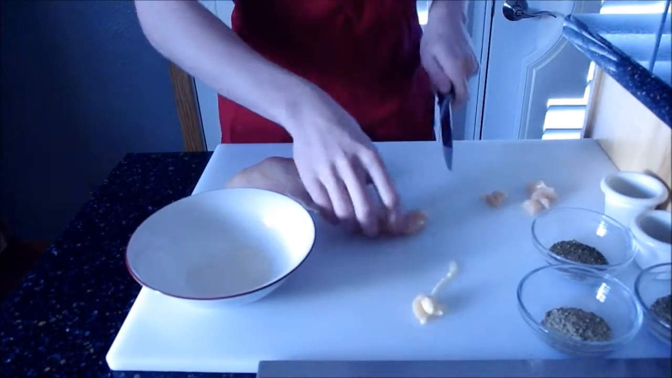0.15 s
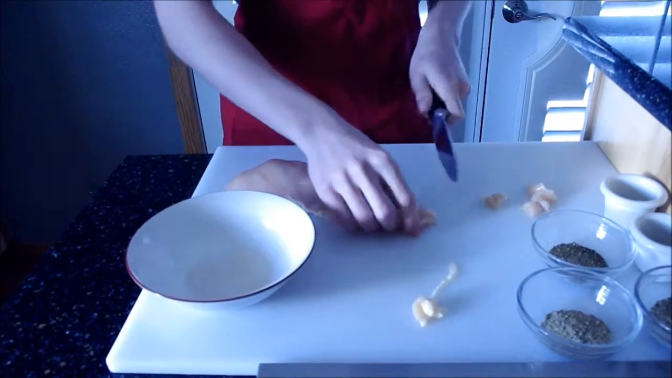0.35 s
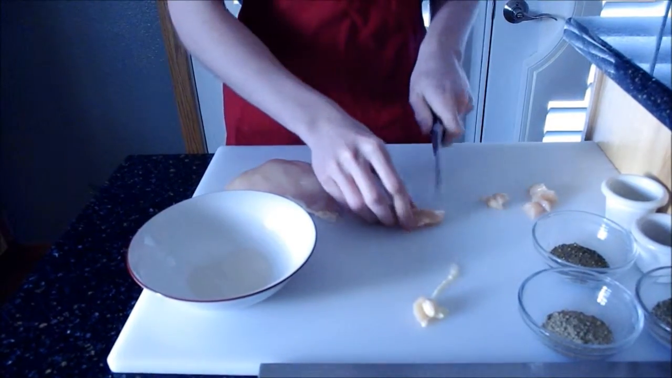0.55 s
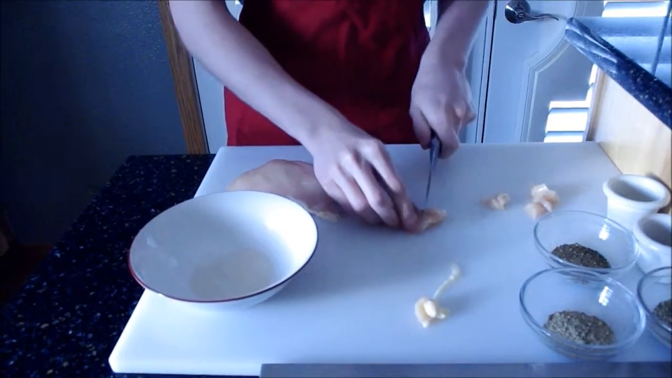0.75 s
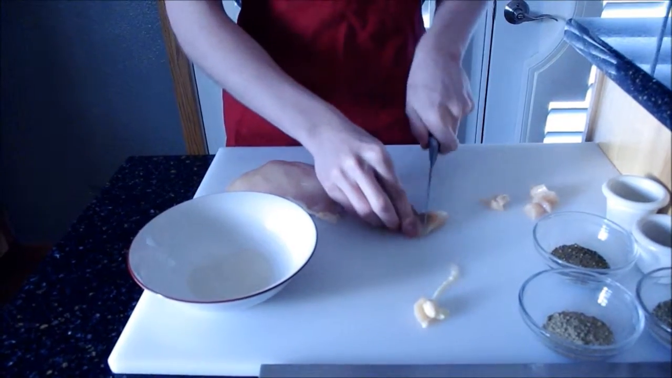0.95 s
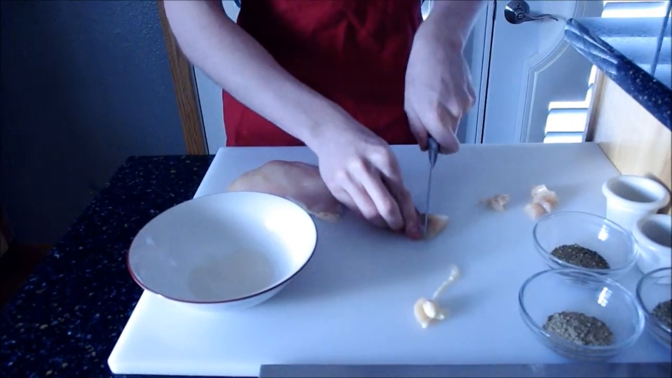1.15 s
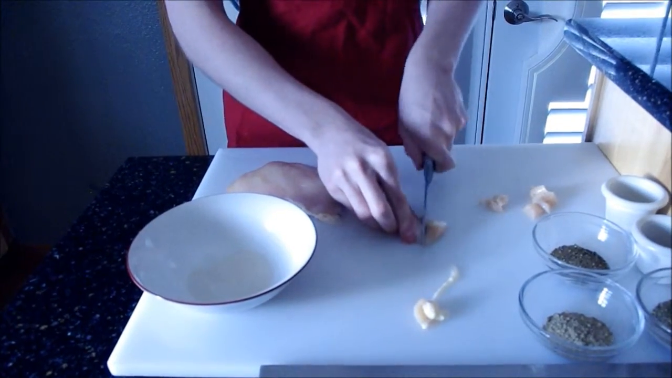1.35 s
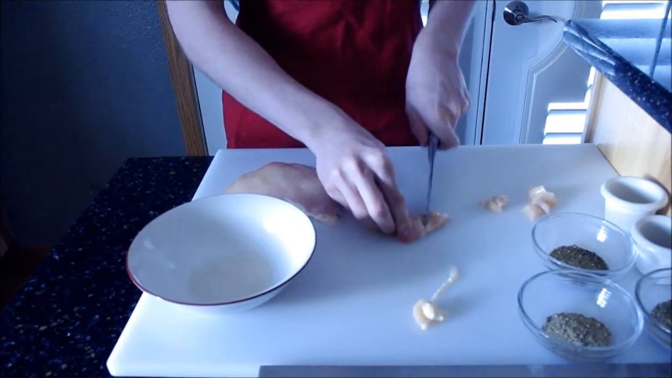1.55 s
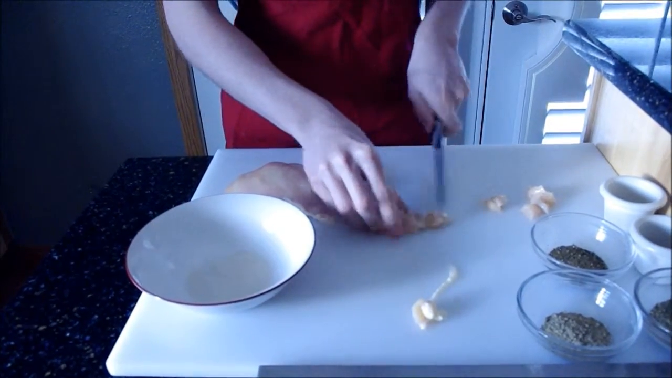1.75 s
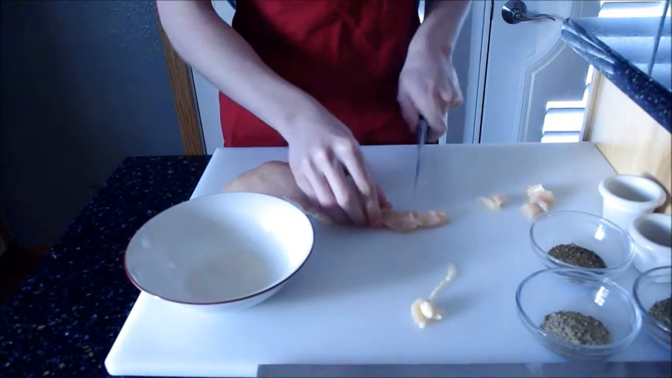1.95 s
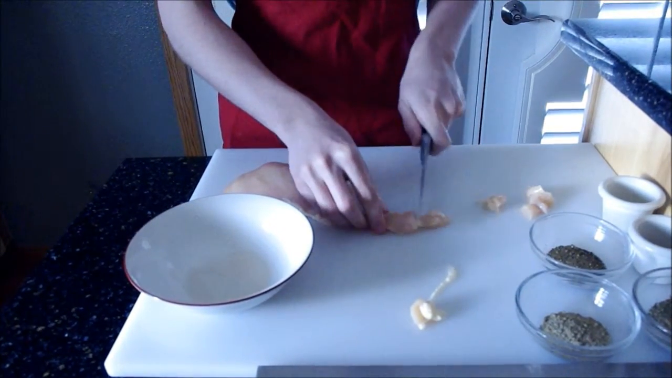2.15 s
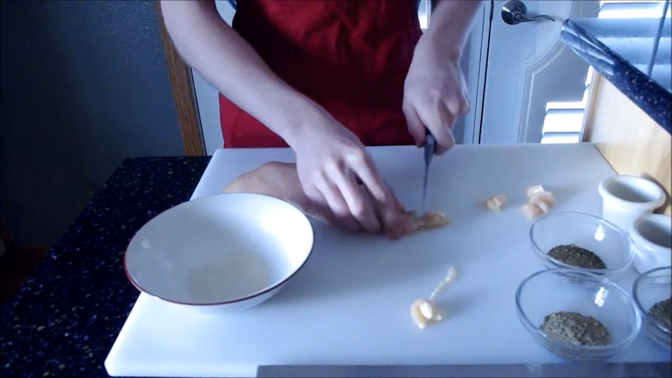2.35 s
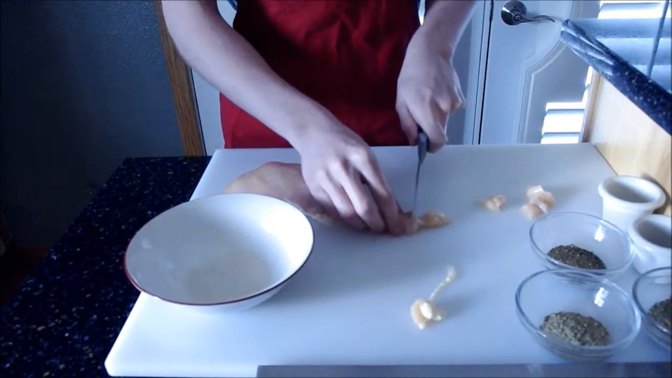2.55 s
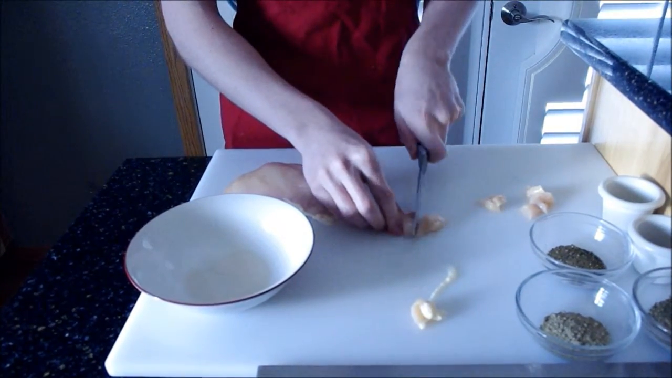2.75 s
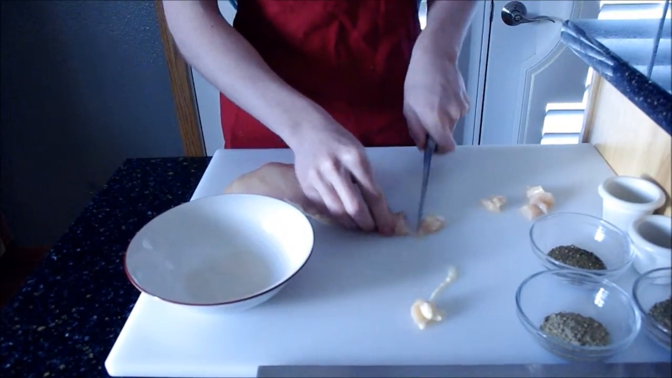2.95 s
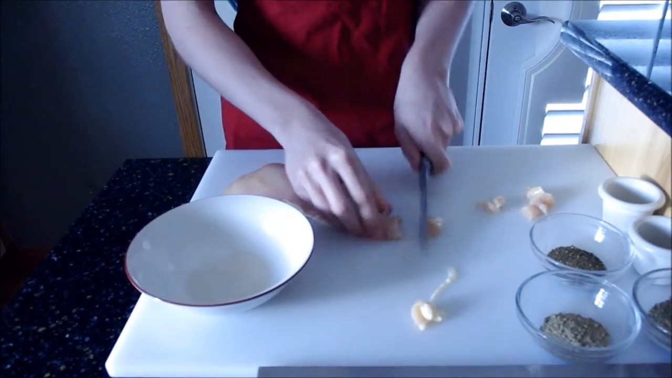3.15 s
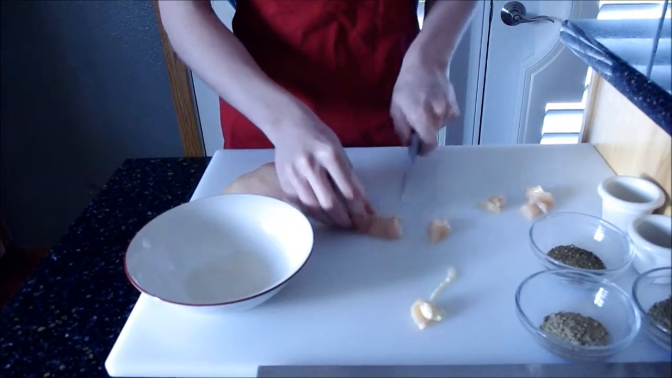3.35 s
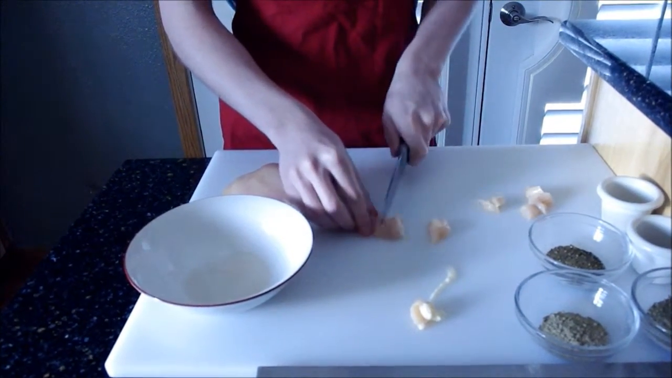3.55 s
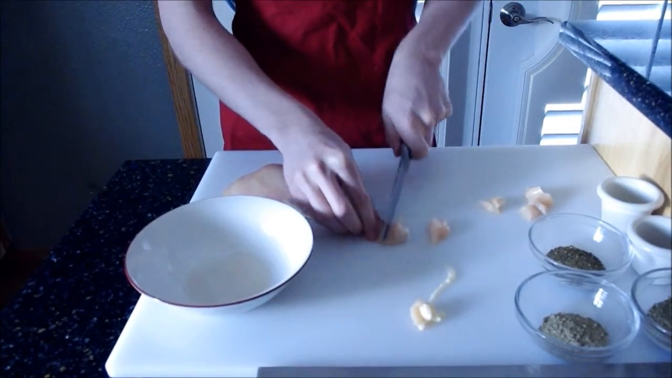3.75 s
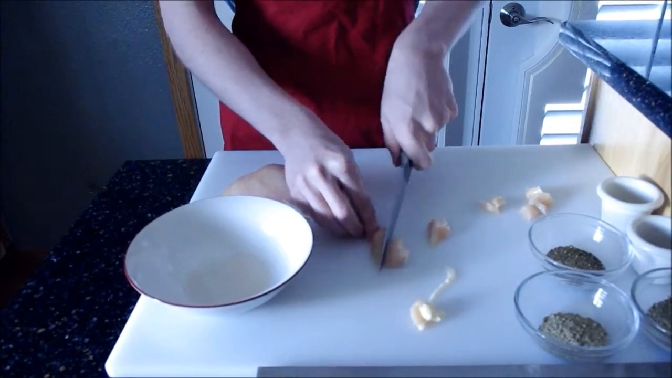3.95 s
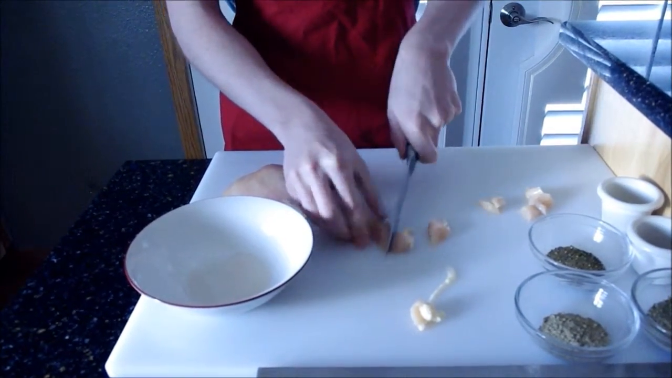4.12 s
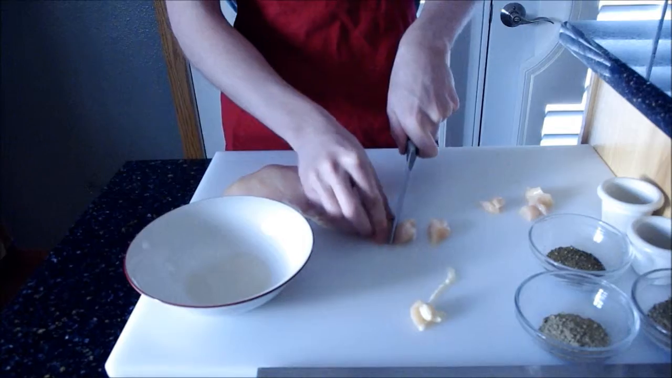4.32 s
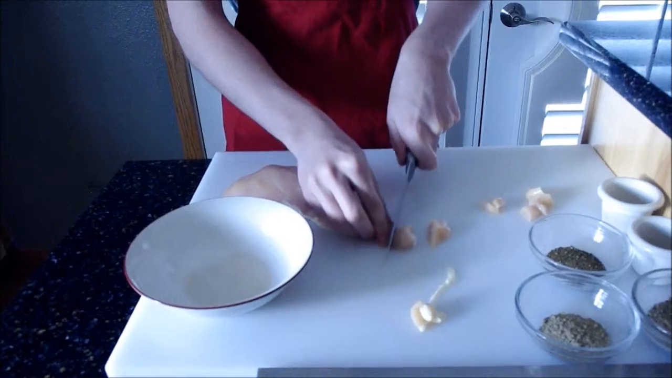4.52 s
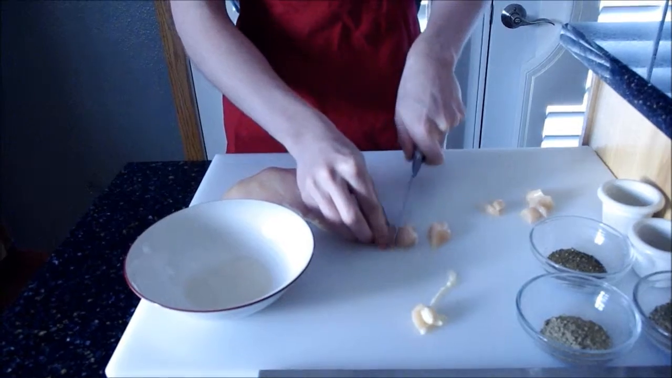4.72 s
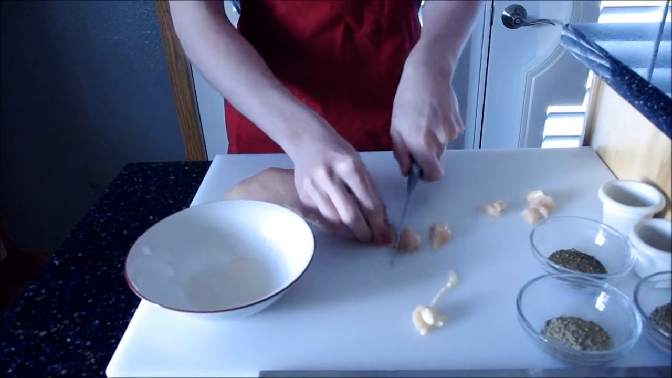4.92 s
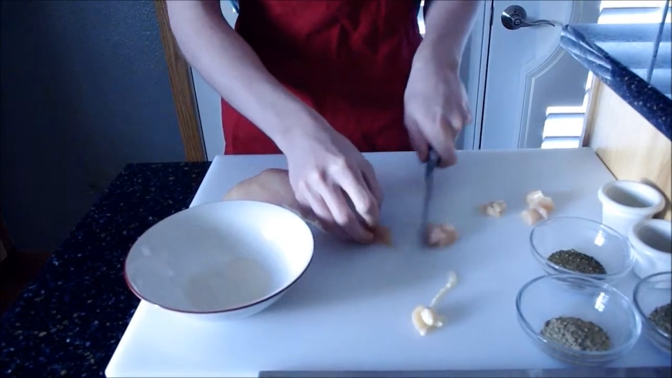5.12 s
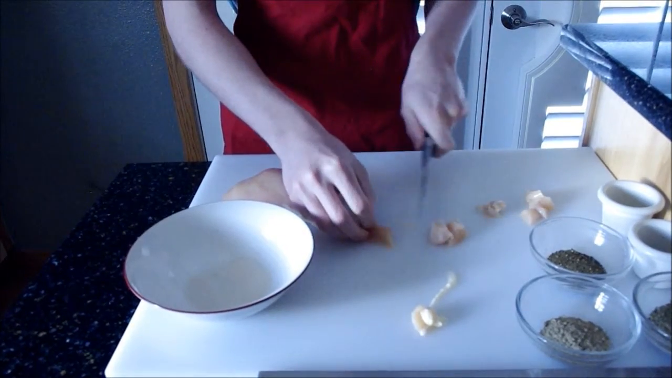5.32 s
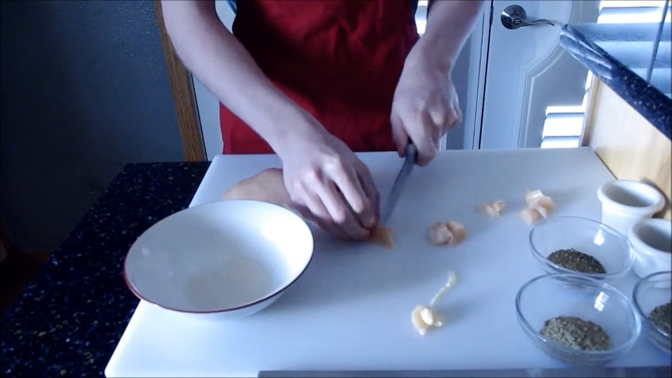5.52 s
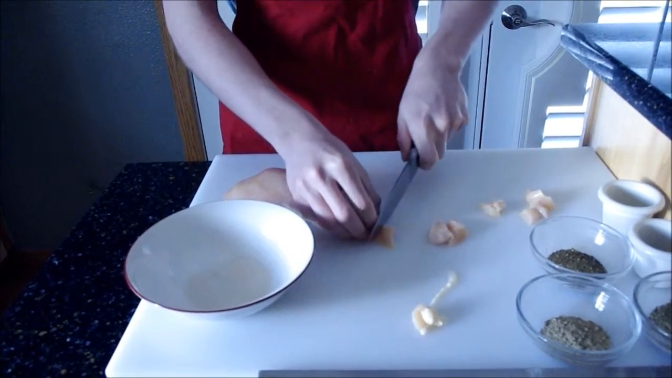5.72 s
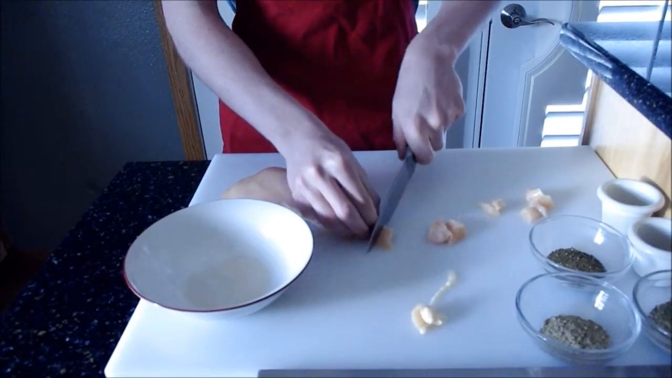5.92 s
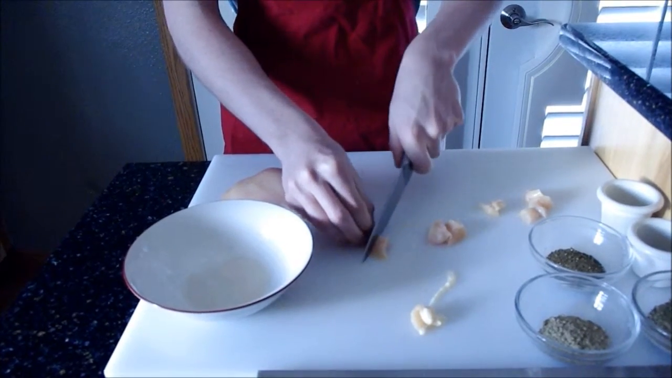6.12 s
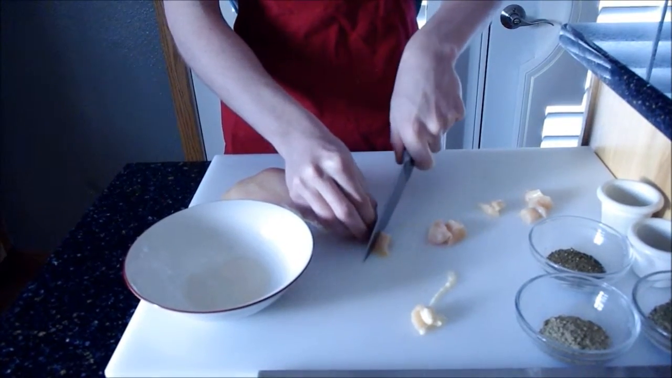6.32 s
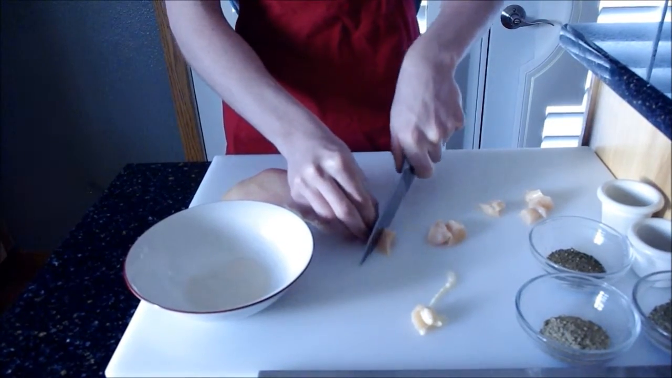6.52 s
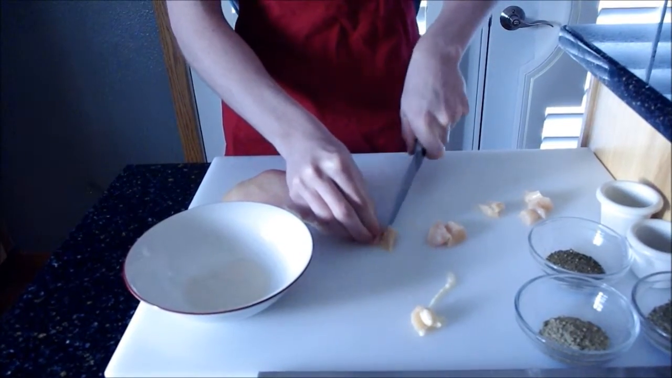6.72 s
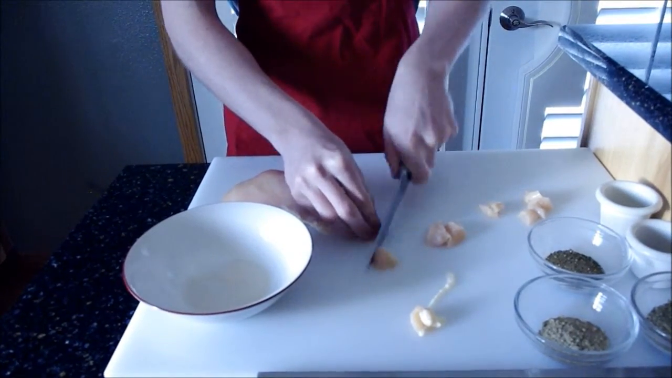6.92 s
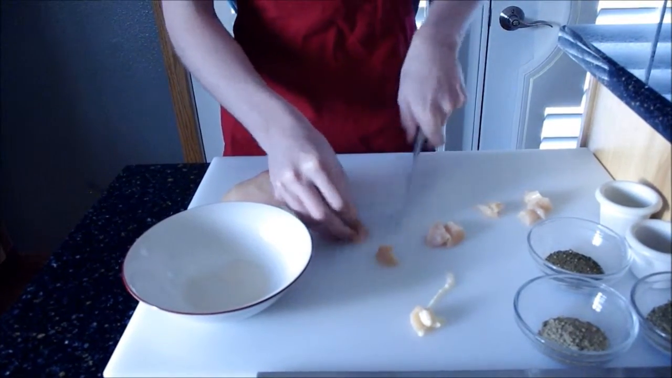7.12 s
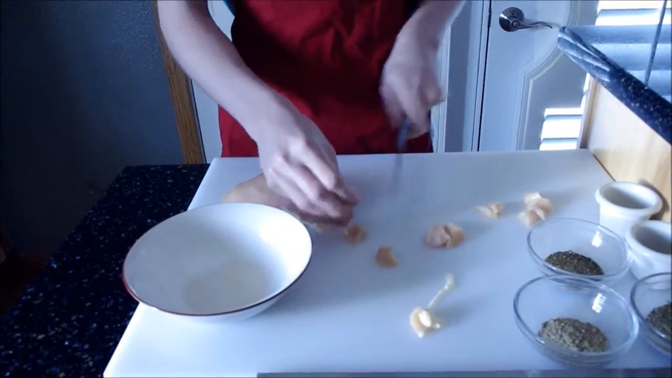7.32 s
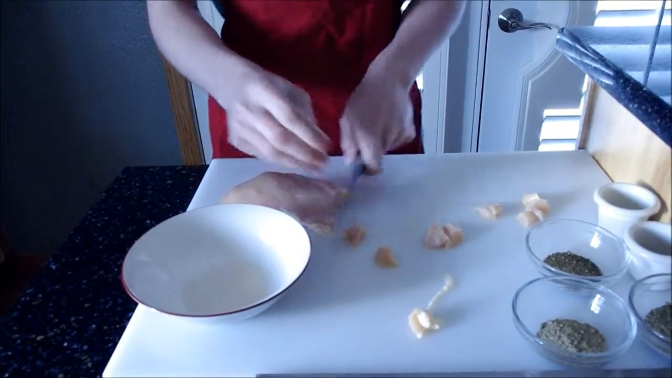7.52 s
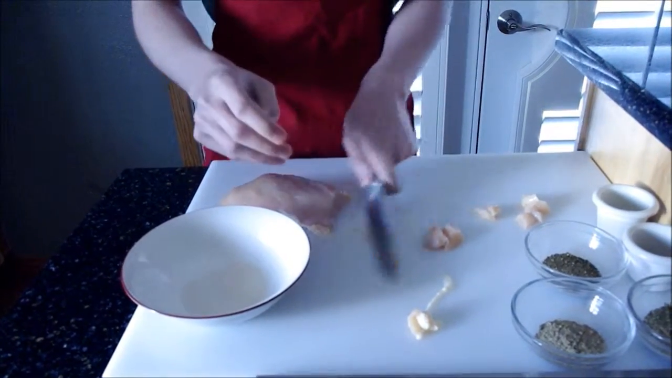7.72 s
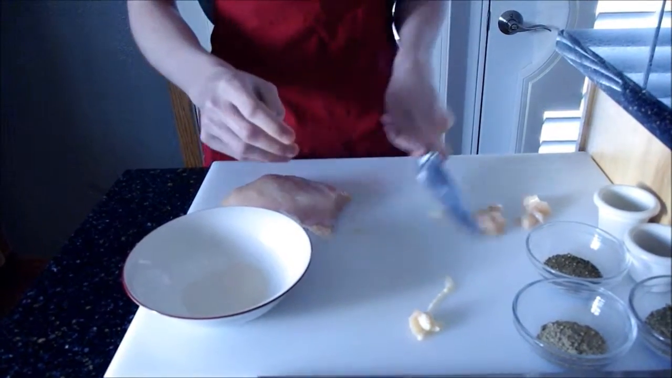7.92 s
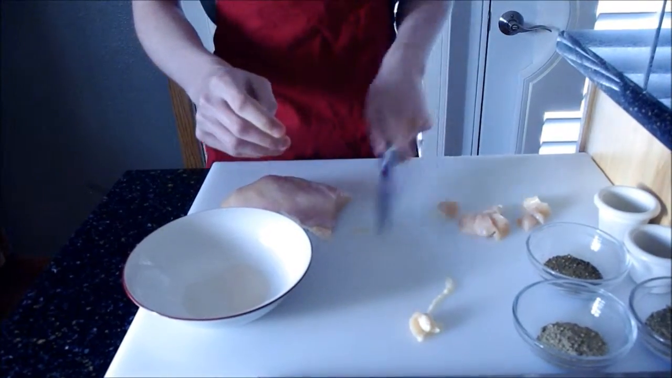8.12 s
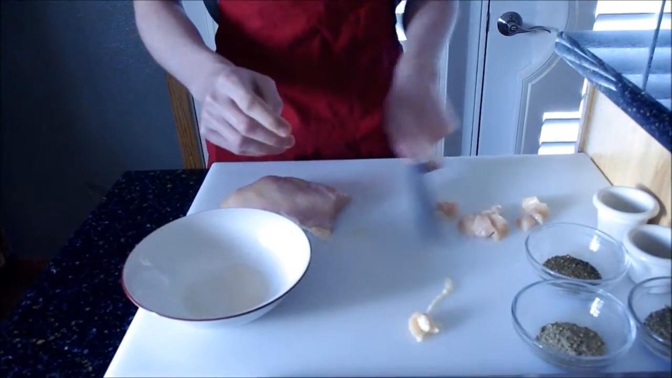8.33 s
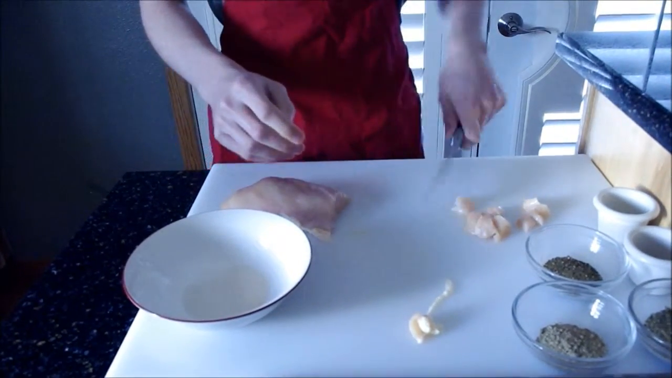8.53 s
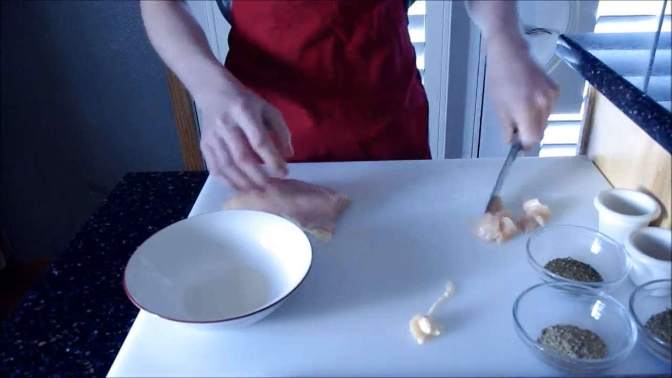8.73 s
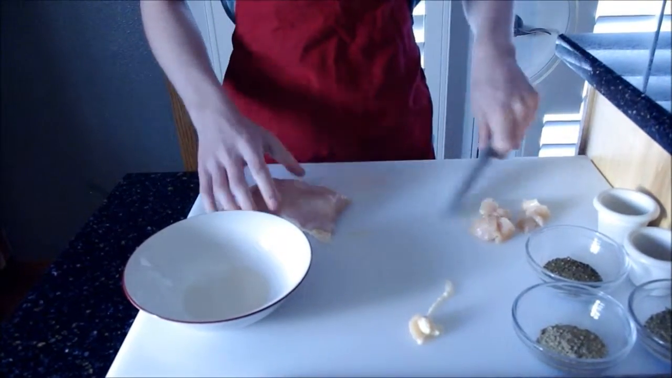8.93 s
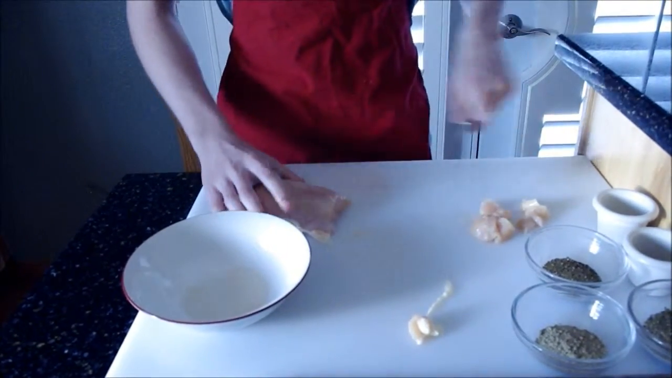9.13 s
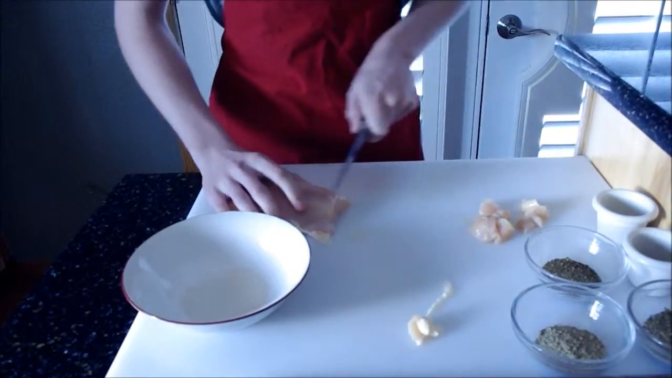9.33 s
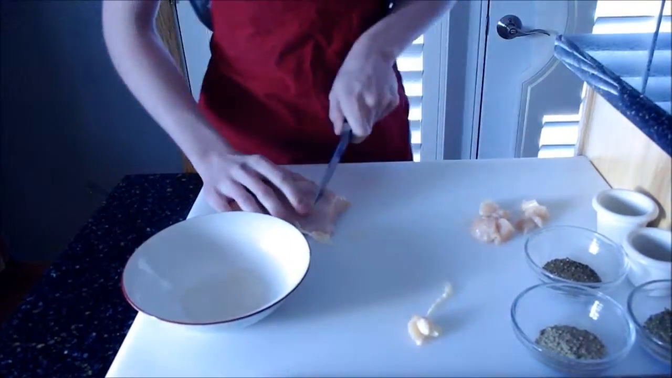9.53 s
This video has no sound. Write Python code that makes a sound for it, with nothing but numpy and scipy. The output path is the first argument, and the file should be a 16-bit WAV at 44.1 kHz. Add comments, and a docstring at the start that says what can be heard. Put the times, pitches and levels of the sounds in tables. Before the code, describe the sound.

A small, hard kitchen heard close up, with steady soft noise, faint mains hum and a thin high whine. A brief knife scrape opens, then quiet wet sawing with tiny ticks at 0.5-1.7 s and a soft tap at 1.24. A short drag at 1.9 precedes a firm knock on the plastic board at 2.8, with a scrape at 3.3. Crackly slicing and fibre snaps run from 3.8 to 5, with a faint hollow bump at 4.6 and a scrape and bright snap near 5.2. After light strokes around 6, a stronger hollow bump clinks at 6.5. Gentle sawing, with a faint narrow hiss, leads to a sharp tick and drag at 7.25. A hard tap at 7.7 starts a rasping sweep; a softer, steelier sweep follows at 8.35. Strong taps with scrapes hit at 8.73 and 9.06, then meat slides very faintly, with another slight hiss.

```python
"""A kitchen knife slices raw meat on a plastic board: taps, wet sawing, ticks, and scrapes that push pieces aside.
Near the end meat slides under the hand. Mains hum, a thin whine and soft noise lie under it; a small hard kitchen answers.
Impacts and random slips drive the modes of blade and board; meat strokes are crackle, fibre snaps short noise bursts.
Hollow bumps, one clink and a faint narrow hiss that swells and fades are added."""
import sys
import numpy as np
from scipy import signal
from scipy.fft import rfft, irfft
from scipy.io import wavfile
from scipy.ndimage import uniform_filter1d

SR = 44100
rng = np.random.default_rng(int(sys.argv[2]) if len(sys.argv) > 2 else 0)


def wav_out(sig):
    """Save sig, one row per channel (or a flat mono array), as 16-bit PCM at SR to the path in sys.argv[1]."""
    wavfile.write(sys.argv[1], SR, np.round(np.clip(np.atleast_2d(sig).T, -1, 1) * 32767).astype(np.int16))


N = 426447

# Steady noise spectrum. Each row: frequency in Hz, relative density in dB.
AIR_SPECTRUM = [(35, -55), (60, -22.5), (80, -33), (110, -20), (250, -12), (500, -14), (800, -15),
                (1440, -22), (3000, -26), (6500, -31.5), (8000, -31), (10000, -34.5), (15000, -55.5)]
AIR_DB = -54
# Mains harmonics. Each row: frequency in Hz, mean rms level in dB.
HUM_TONES = [(177.6, -67.5), (360.7, -79), (538.3, -63), (721.4, -66.5), (780.6, -70), (899.0, -102),
             (1200, -69), (1260, -79)]
# Thin high tones. Each row: frequency in Hz, mean rms level in dB.
WHINE_TONES = [(7440, -82), (7838, -85), (7897, -69), (7957, -90)]
# Room decay. Each row: band centre in Hz, t60 in seconds, relative level in dB.
ROOM_BANDS = [(207, 0.38, 4), (526, 0.26, 10), (1103, 0.42, 7.5), (2820, 0.4, 6), (6000, 0.39, -2),
              (13000, 0.18, 5)]
SNAP_ROOM_DB = -4  # thin ticks feed the room less than the board does
BASS_CUT_HZ, TREBLE_DROOP_HZ, TOP_HZ = 200, 9860, 15100
# Faint narrow hiss. Each row: start in seconds, length in seconds, level in dB.
NARROW_HISSES = [(6.7, 0.82, -64.5), (9.12, 0.6, -63.5)]
NARROW_HISS_HZ = 3160
# Something hollow bumps the counter. Each row: start in seconds, level in dB.
BUMP_EVENTS = [(4.608, -29), (6.482, -21)]
# Modes of the hollow thing. Each row: frequency in Hz, width in Hz, level in dB.
HOLLOW_MODES = [(247, 42, -5), (468, 12.4, 2.5), (790, 120, -5), (1230, 53, -5), (1980, 34, -21),
                (2550, 64, 2), (3000, 99, -14)]
# Counter and steel shiver once. Each row: frequency in Hz, relative level in dB, t60 in seconds.
CLINK_MODES = [(113, 1, 0.17), (1985, -4.5, 0.16), (4720, -8, 0.065), (4830, -4, 0.045), (8100, -8, .05),
               (8000, -4, .06), (8480, 8, 0.047), (12600, -8, .04)]
CLINK_START_S, CLINK_DB = 6.487, -32.5
# Wet fibres let go of the steel. Each row: start in seconds, level in dB, pitch in Hz, width in octaves.
FIBRE_SNAPS = [(0.4933, -43, 4240, 1), (0.9287, -41, 8000, 0.63), (1.1336, -21.5, 5460, 1.66),
               (1.413, -34, 7080, 1.1), (1.5459, -34, 8500, .85), (1.5705, -27.5, 8900, 0.2),
               (2.8364, -39, 3770, 0.75), (2.8673, -28, 3920, 1.1), (2.884, -29, 7660, 0.26),
               (2.905, -35, 8300, 0.48), (2.928, -28.5, 7740, 0.38), (3.024, -34, 7200, 0.91),
               (3.055, -32.5, 5700, 1.7), (3.9314, -34, 6500, 1.7), (3.956, -34.5, 4630, 0.84),
               (4.031, -32, 7280, .9), (4.049, -33, 5700, 0.71), (4.208, -26, 4430, 1.8),
               (4.276, -32, 5170, 2.8), (4.777, -31, 8000, 0.74), (4.8097, -28.5, 8150, 0.47),
               (4.8336, -26.5, 8900, 0.64), (5.258, -18, 8400, 1.9), (5.289, -21.5, 8850, 0.19),
               (6.0048, -39, 5060, 0.61), (6.122, -45, 7940, 1), (6.1657, -34, 8350, 0.72),
               (6.401, -38, 7700, .9), (6.6757, -35, 10700, 0.26), (6.7131, -37, 8620, 0.74),
               (6.895, -40, 6000, 0.75), (7.1102, -40, 3850, 0.69), (7.2727, -15, 8400, .6),
               (7.81, -19, 3600, 1.5), (8.018, -23, 8830, 0.69), (8.095, -34, 8810, .8),
               (8.7594, -29, 7070, 0.82), (9.0952, -20, 6600, 0.45)]
# Board modes. Each row: frequency in Hz, width in Hz before broadening, relative level in dB.
BOARD_MODES = [(678, 45, -8), (1158, 38, 1), (1650, 50, -9), (2020, 32, -10), (2320, 60, 1), (2735, 22, -5),
               (2940, 30, -12), (3250, 120, -11), (3880, 70, -16), (4380, 150, -12)]
# Blade modes. Each row: frequency in Hz, width in Hz before broadening, relative level in dB.
BLADE_MODES = [(4840, 200, -15), (5390, 30, 0), (6830, 120, -2), (7080, 50, -5), (8460, 40, -9),
               (8950, 120, 3), (10200, 65, -3), (11230, 60, 3), (12100, 50, -5), (13700, 90, -8)]
# Sawing strokes, one short scrape (6.178 s), and meat sliding under the hand at the end (last two rows).
# Each row: full at in seconds, rise, hold and fall in seconds, hiss and body in dB.
MEAT_STROKES = [(0.49, .1, 0.0086, 0.087, -53.5, -53), (1.134, 0.12, 0.0026, 0.036, -54, -52),
                (1.18, .06, 0.055, 0.056, -58, -75), (1.448, 0.11, .005, 0.078, -46, -51),
                (1.572, .03, .005, 0.061, -52, -50.5), (1.64, 0.29, 0.022, 0.11, -53.5, -47.5),
                (2.884, 0.17, 0.025, 0.18, -47.5, -54), (3.03, 0.027, 0.078, 0.065, -50, -47),
                (3.22, 0.12, 0.042, .03, -52, -47.5), (3.842, 0.071, 0.0046, 0.088, -58, -66),
                (3.956, 0.1, .005, 0.085, -45, -51), (4.058, 0.032, .005, 0.063, -46.5, -40),
                (4.204, 0.031, 0.0073, 0.15, -52, -43.5), (4.56, 0.37, 0.027, 0.11, -57, -61),
                (4.81, 0.14, .03, 0.26, -52.5, -53), (4.984, .1, .005, 0.4, -55.5, -57.5),
                (6.002, 0.038, .005, .12, -55.5, -74), (6.126, 0.19, 0.0046, 0.036, -55, -58.5),
                (6.178, 0.032, 0.011, 0.049, -43.5, -42), (6.46, 0.13, 0.0069, .04, -53, -55),
                (6.676, 0.016, 0.17, 0.059, -55, -53), (6.93, 0.076, 0.16, 0.074, -55, -53),
                (7.14, 0.077, 0.18, .05, -50, -52), (7.56, 0.23, .02, 0.18, -48, -56),
                (9.21, .03, .005, 0.45, -83, -62), (9.42, 0.67, 0.039, 0.58, -72, -65)]
# Short drags over the board. Each row: full at in seconds, rise, hold and fall in seconds,
# then blade ring, scratch, board ring, shudder and rumble in dB.
SCRAPE_STROKES = [(0.018, 0.028, 0.0032, 0.033, -30, -29.5, -45, -42, -75),
                  (1.864, 0.047, 0.026, 0.025, -33, -32, -59, -35.5, -48),
                  (2.808, 0.0055, .01, .12, -54, -36, -57, -42, -56),
                  (3.276, 0.0056, 0.014, 0.022, -33.5, -34.5, -43, -39, -39),
                  (5.19, 0.054, 0.053, 0.063, -37, -33, -54, -35, -53),
                  (5.29, 0.031, .003, 0.016, -34, -45, -39.5, -54, -44),
                  (7.252, 0.062, 0.026, 0.045, -31, -30.5, -32.5, -37, -52),
                  (8.728, 0.0035, 0.072, 0.092, -45, -28.5, -43, -39, -46),
                  (9.069, 0.0039, 0.028, 0.094, -31.5, -30, -47, -38, -42)]
STROKE_RANGE_DB = 30  # change over one rise or fall time
# Long sweeps that push pieces aside, one list each. Each row: time in seconds, scratch in dB, blade ring in dB.
SWEEP_PATHS = [
    [(7.722, -31, -40), (7.742, -33, -40), (7.789, -30, -32), (7.811, -24, -30.5), (7.867, -36, -34.5),
     (7.919, -37.5, -32), (8.019, -41, -38), (8.04, -48.5, -50), (8.06, -66, -75)],
    [(8.355, -27.5, -38), (8.373, -37, -36), (8.409, -33, -20.5), (8.427, -25, -25), (8.451, -27.5, -25),
     (8.49, -30.5, -26), (8.56, -50, -50), (8.64, -53, -66)],
]
# Board ring relative to the scratch. Each entry: one sweep's offset in dB.
SWEEP_BOARD_OFFSET_DB = (-0.5, 2.5)
# Board shudder relative to the scratch. Each entry: one sweep's offset in dB.
SWEEP_SHUDDER_OFFSET_DB = (-8.5, -9)
# Low rumble relative to the scratch. Each entry: one sweep's offset in dB.
SWEEP_RUMBLE_OFFSET_DB = (-22.5, -13.5)
# Edge lands on the board. Each row: start in seconds, level in dB, crack, thud and body in dB,
# blade ring in dB re the crack, board ring in dB, spot note in Hz, spot note in dB.
TAP_EVENTS = [(1.239, -17.5, 2.5, -6, 0, -31, -8, 913, -8.5),
              (2.801, -7.5, -17, -12.5, -4, -1.5, -18, 1454, -19),
              (7.718, -3.5, -12, -20.5, -9.5, -9, -12, 1178, -10.5),
              (8.354, -23.5, 0, -3, -17, 1, -16, 1570, -12),
              (8.727, -2.5, -10, -18.5, -6.5, -24, -10.5, 1410, -27),
              (9.064, -6, -14, -15, -3.5, 2, -15, 1023, -17.5)]


def amp(db):
    """Gain of a level in dB."""
    return 10 ** (np.asarray(db) / 20)


def unit(x):
    """Scale to rms 1."""
    return x / np.sqrt(np.mean(x ** 2))


def peak(x):
    """Scale to peak 1."""
    return x / np.max(np.abs(x))


def decay(t, t60):
    """Exponential fall of 60 dB in t60 seconds."""
    return np.exp(-np.log(1000) * t / t60)


def add(out, start_s, x):
    """Mix a short sound in at start_s."""
    i = int(start_s * SR)
    out[i:i + len(x)] += x[:N - i]


def band(x, lo_hz, hi_hz, order=2):
    """Butterworth band-pass."""
    edges_hz = [lo_hz, min(hi_hz, .45 * SR)]
    return signal.sosfilt(signal.butter(order, edges_hz, "band", fs=SR, output="sos"), x)


def walk(rate_hz):
    """Random levels held 1 / rate_hz seconds and slewed twice."""
    k = int(SR / rate_hz)
    steps = np.repeat(rng.standard_normal(N // k + 1), k)
    return uniform_filter1d(uniform_filter1d(steps, k), k)[:N]


def ring(x, modes, broaden=1, wander_db=0):
    """Sum of resonances of alternating sign; a moving contact point feeds each one unevenly."""
    total = 0
    for k, (hz, width_hz, db) in enumerate(modes):
        drive = x * amp(wander_db * walk(14)) if wander_db else x
        b, a = signal.iirpeak(hz, hz / max(width_hz * broaden, 5), fs=SR)
        total = total + (-1) ** k * amp(db) * signal.lfilter(b, a, drive)
    return total


def grains(per_s, spread_db):
    """Random clicks of either sign and uneven size."""
    hit = rng.random(N) < per_s / SR
    sign = rng.choice([-1, 1], size=N)
    size = amp(spread_db * np.minimum(rng.exponential(size=N), 3.5))
    return unit(hit * sign * size)


def strokes(rows):
    """Gain over time of each level column: every stroke swells, holds and fades."""
    t, gains = np.arange(N) / SR, np.zeros((len(rows[0]) - 4, N))
    for full_s, rise_s, hold_s, fall_s, *levels_db in rows:
        i, k = (int(np.clip(edge_s * SR, 0, N)) for edge_s in (full_s - rise_s, full_s + hold_s + fall_s))
        before = (full_s - t[i:k]) / max(rise_s, 1 / SR)
        after = (t[i:k] - full_s - hold_s) / max(fall_s, 1 / SR)
        away = np.maximum(np.maximum(before, after), 0)
        gains[:, i:k] += amp(np.add.outer(levels_db, -STROKE_RANGE_DB * away))
    return gains


def background():
    """Shaped steady noise, mains harmonics that waver a little, and a cluster of thin high tones."""
    t, hz = np.arange(N) / SR, np.fft.rfftfreq(N, 1 / SR)
    at_hz, db = np.transpose(AIR_SPECTRUM)
    shape = amp(np.interp(np.log(hz + 1), np.log(at_hz), db))
    air = irfft(rfft(rng.standard_normal(N)) * shape, N)
    tones = 0
    for tone_hz, tone_db in HUM_TONES + WHINE_TONES:
        sine = np.sqrt(2) * np.sin(2 * np.pi * (tone_hz * t + rng.random()))
        tones = tones + amp(tone_db + 0.84 * walk(5.6)) * sine
    return amp(AIR_DB + 1.06 * walk(3.96)) * unit(air) + tones


def kitchen(dry, wet_db=-4, build_s=0.0031):
    """Dense reflections that build up and die away band by band."""
    t, tail = np.arange(int(.6 * SR)) / SR, 0
    for hz, t60, db in ROOM_BANDS:
        noise = band(rng.standard_normal(len(t)), hz / 1.364, hz * 1.47)
        tail = tail + amp(db) * decay(t, t60) * noise
    tail = tail * (1 - np.exp(-t / build_s))
    tail = tail / np.sqrt(np.sum(tail ** 2))
    return amp(wet_db) * signal.fftconvolve(dry, tail)[:N]


def narrow_hiss():
    """Noise through one narrow resonance: a faint wavering hiss that swells and fades."""
    t, gain = np.arange(N) / SR, 0
    hiss = unit(ring(rng.standard_normal(N), [(NARROW_HISS_HZ, 110, 0)]))
    for start_s, length_s, db in NARROW_HISSES:
        phase = np.clip((t - start_s) / length_s, 0, 1)
        gain = gain + amp(db) * np.sqrt(np.sin(np.pi * phase).clip(0))
    return hiss * gain


def bumps():
    """A soft blow with one rebound rings hollow modes; a noise burst rattles along."""
    out, t = np.zeros(N), np.arange(SR // 3) / SR
    blow = decay(t, 0.004)
    blow = blow + amp(-18) * np.roll(blow, int(0.0094 * SR))
    hollow = peak(ring(blow, HOLLOW_MODES))
    for start_s, db in BUMP_EVENTS:
        noise = rng.standard_normal(len(t))
        rattle = band(noise * decay(t, 0.087) * (1 - decay(t, 0.024)), 350, 2800)
        add(out, start_s, amp(db) * (hollow + amp(-8.5) * peak(rattle)))
    return out


def clink():
    """Free modes set off by one jolt: decaying sines."""
    out, t = np.zeros(N), np.arange(SR // 2) / SR
    shiver = sum(amp(db) * decay(t, t60) * np.sin(2 * np.pi * hz * t) for hz, db, t60 in CLINK_MODES)
    add(out, CLINK_START_S, amp(CLINK_DB) * shiver)
    return out


def snaps():
    """Wet fibres snap: short decaying noise bursts, each in its own band."""
    out, t = np.zeros(N), np.arange(SR // 30) / SR
    for start_s, db, hz, octaves in FIBRE_SNAPS:
        spread = 2 ** (np.clip(octaves, .1, 3) / 2)
        burst = rng.standard_normal(len(t)) * decay(t, 0.014)
        add(out, start_s, amp(db) * peak(band(burst, hz / spread, hz * spread)))
    return out


def meat_strokes():
    """Tearing fibres and sliding meat as a fine crackle; blade and board modes, damped, colour it a little."""
    hiss_gain, body_gain = strokes(MEAT_STROKES)
    crackle = grains(per_s=5600, spread_db=5.0) * amp(3.9 * walk(40))
    blade = ring(crackle, BLADE_MODES, broaden=15.0)
    hiss = band(crackle, 4400, 9000) + amp(-12) * blade
    board = ring(band(crackle, 2120, 3700, order=3), BOARD_MODES, broaden=14.0, wander_db=7.0)
    body = band(crackle, 1560, 5600) + amp(-23) * board
    return hiss_gain * unit(hiss) + body_gain * unit(body)


def sweeps():
    """Gains of the five scrape layers; board, shudder and rumble follow the scratch."""
    t, gains = np.arange(N) / SR, 0
    offsets = zip(SWEEP_BOARD_OFFSET_DB, SWEEP_SHUDDER_OFFSET_DB, SWEEP_RUMBLE_OFFSET_DB)
    for rows, offsets_db in zip(SWEEP_PATHS, offsets):
        s, scratch_db, blade_db = np.transpose(rows)
        active = (t > s[0]) * (t < s[-1])
        scratch = amp(np.interp(t, s, scratch_db)) * active
        blade = amp(np.interp(t, s, blade_db)) * active
        gains = gains + np.array([blade, scratch, *(scratch * amp(db) for db in offsets_db)])
    return gains


def scrapes():
    """The edge catches and slips on the scored plastic; the same jolts ring blade and board."""
    slips = unit(grains(per_s=5000, spread_db=3.0) * amp(3.0 * walk(80)))

    def blade(x):
        return ring(x, BLADE_MODES, broaden=1.02, wander_db=2.5) + amp(-13.5) * band(x, 2580, 14100)

    def scratch(x):
        return band(x, 712, 2490) + amp(-8.5) * band(x, 2180, 4550)

    def board(x):
        return band(ring(x, BOARD_MODES, broaden=1.4, wander_db=1.8), 410, 5650)

    def shudder(x):  # the whole board on the counter
        return band(x, 304, 572)

    def rumble(x):
        return band(x, 148, 344)

    layers = (blade, scratch, board, shudder, rumble)
    out = 0
    for layer, gain in zip(layers, strokes(SCRAPE_STROKES) + sweeps()):
        # gain ahead of the resonances: steel and board ring on after the stroke
        out = out + layer(slips * gain) / np.std(layer(slips))
    return out


def taps():
    """A blunt push with one rebound, a crack of steel, a thud into the counter; board and blade ring on."""
    out, t = np.zeros(N), np.arange(SR // 4) / SR
    push = np.diff(decay(t, 0.002), prepend=0)
    push = push + amp(-3) * np.roll(push, int(0.0013 * SR))
    knock = peak(band(push, 776, 1640))
    body = peak(band(push, 407, 910))
    thud = peak(band(push, 220, 513))
    board = peak(ring(push, BOARD_MODES, broaden=2.6))
    for start_s, db, crack_db, thud_db, body_db, blade_db, board_db, note_hz, note_db in TAP_EVENTS:
        crack = peak(band(rng.standard_normal(len(t)) * decay(t, 0.015), 1200, 7600))
        steel = amp(crack_db) * (crack + amp(blade_db) * peak(ring(crack, BLADE_MODES)))
        note = decay(t, 0.053) * np.sin(2 * np.pi * note_hz * t)
        plastic = knock + amp(body_db) * body + amp(board_db) * board + amp(note_db) * note
        add(out, start_s, amp(db) * (plastic + steel + amp(thud_db) * thud))
    return out


def scene():
    """Knife work in the room, over the background."""
    board = narrow_hiss() + bumps() + clink() + meat_strokes() + scrapes() + taps()
    ticks = snaps()
    heard = board + ticks + kitchen(board + amp(SNAP_ROOM_DB) * ticks)
    # the small microphone misses deep bass and the highest treble of the knife work
    return (band(heard, BASS_CUT_HZ, TREBLE_DROOP_HZ) + background())[None]


def record(dry):
    """The recorder cuts the top with a steep low-pass."""
    return signal.sosfilt(signal.ellip(12, .2, 90, TOP_HZ, fs=SR, output="sos"), dry)


dry = scene()
out = record(dry)
wav_out(out)
```